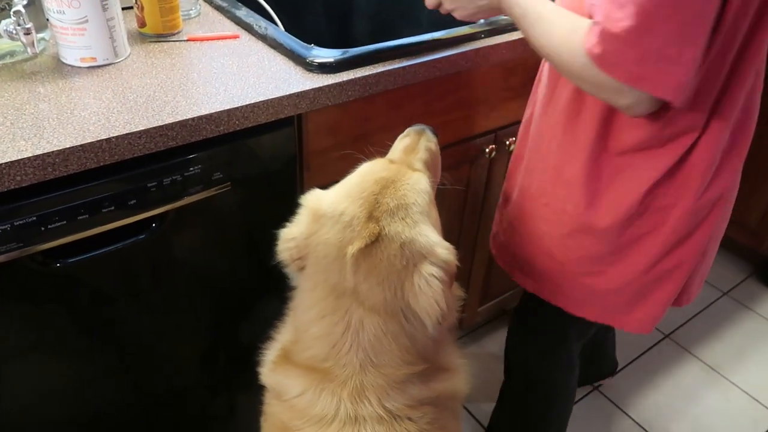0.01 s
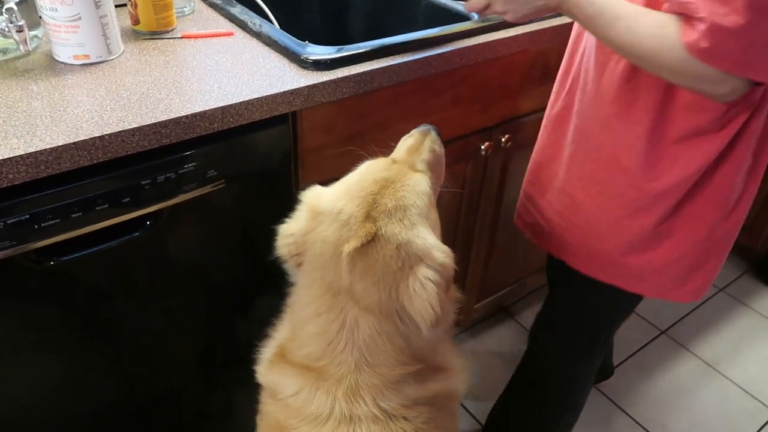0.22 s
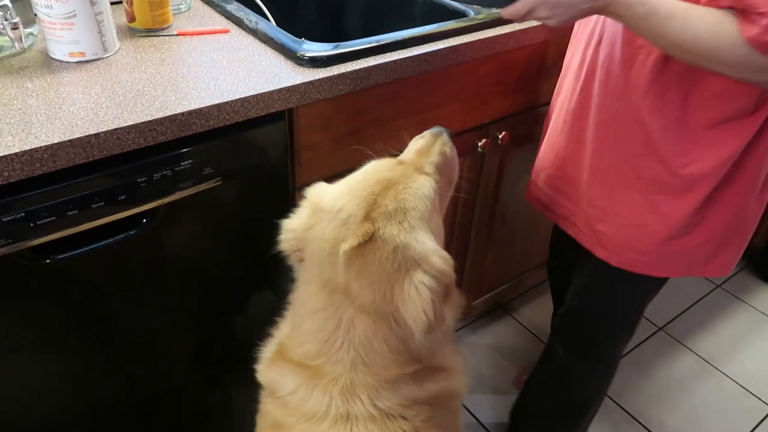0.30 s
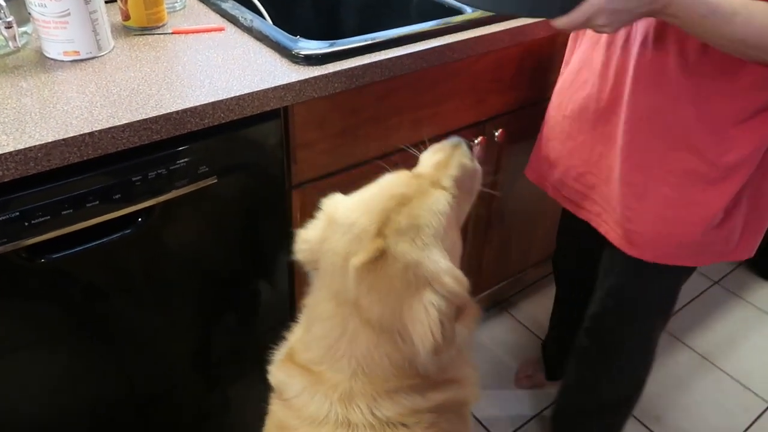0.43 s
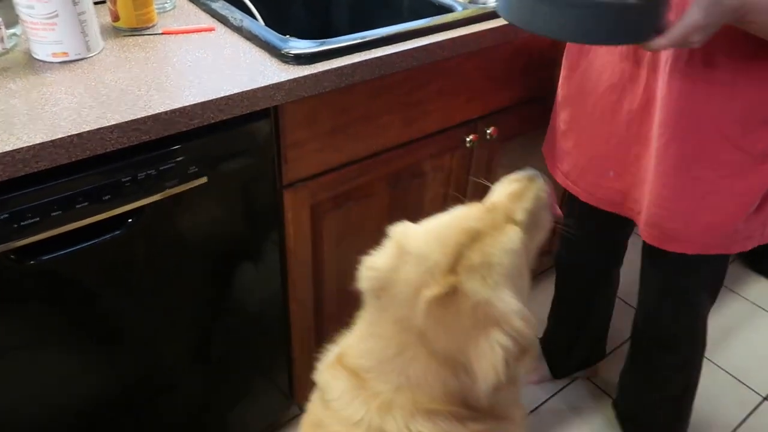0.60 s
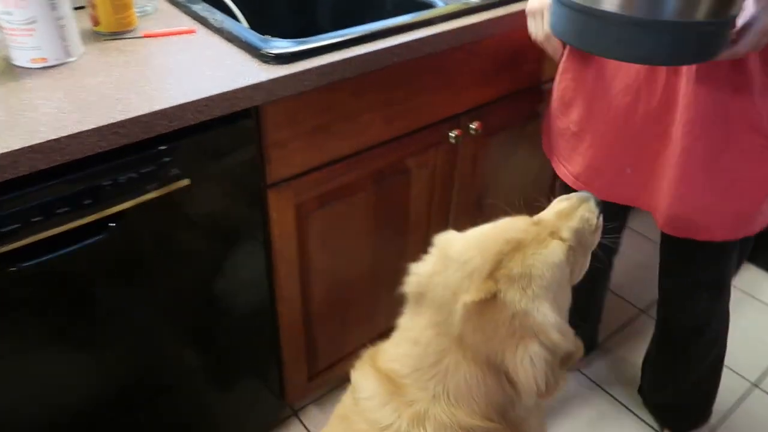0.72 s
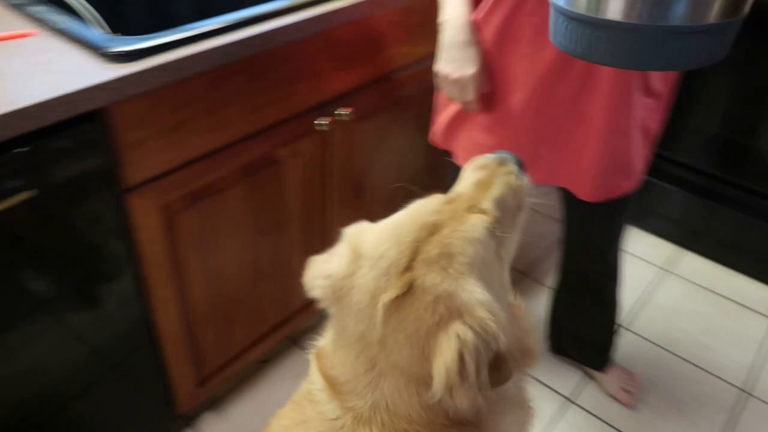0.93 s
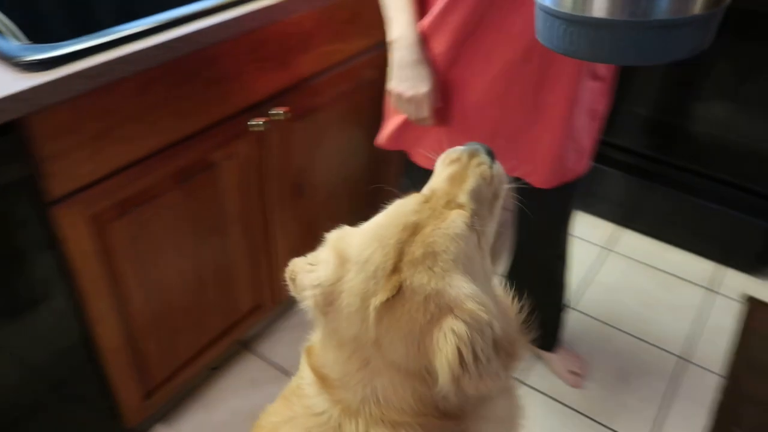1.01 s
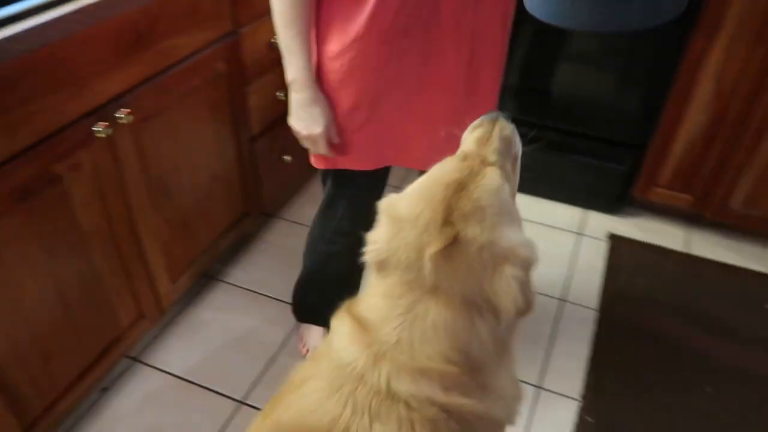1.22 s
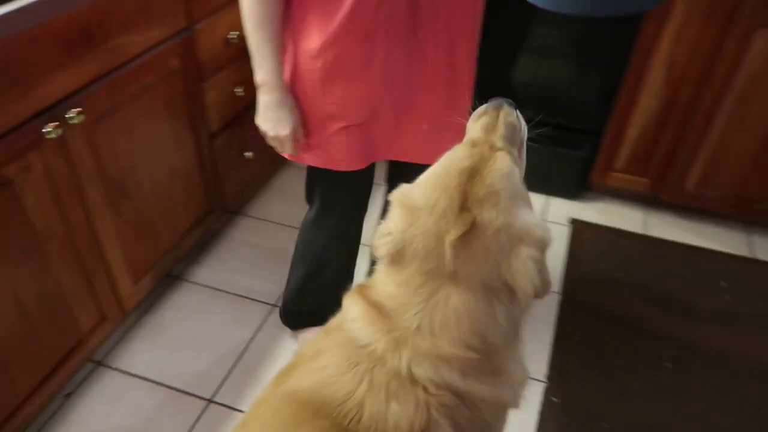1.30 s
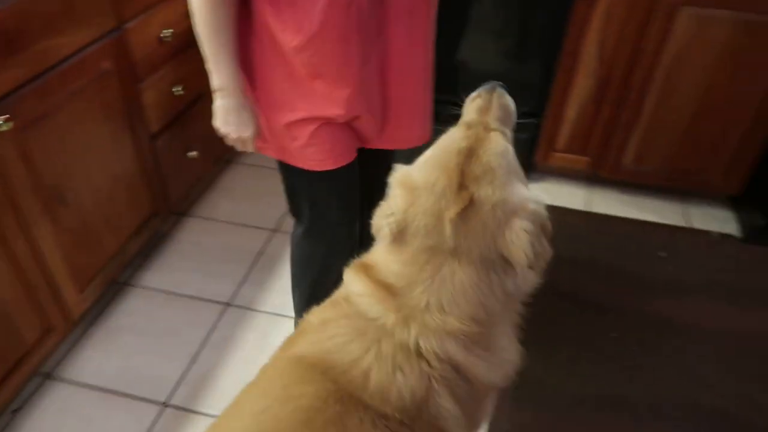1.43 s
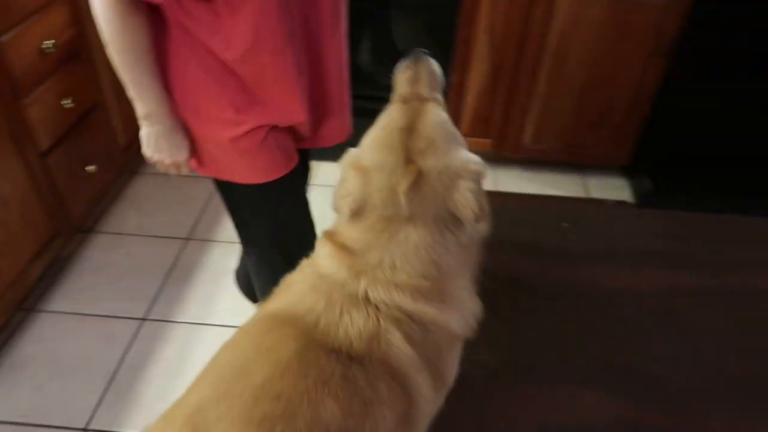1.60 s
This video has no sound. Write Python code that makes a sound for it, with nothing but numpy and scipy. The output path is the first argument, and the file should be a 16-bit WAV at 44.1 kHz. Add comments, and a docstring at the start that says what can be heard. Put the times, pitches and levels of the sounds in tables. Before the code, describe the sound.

A metal bowl knocks twice on a kitchen sink and rattles, then feet and paws scuff tiles

```python
"""A fridge hums under the room noise; a steel bowl then knocks twice against a kitchen sink and rattles
to rest, and feet and paws scuff the tiles. Hum is a sum of wavering sines and room noise is shaped noise;
knocks are damped modes with noise bursts, scuffs are band noise, and claws are damped sines.
A diffuse kitchen tail follows them. A small camera hears it all through two close ports."""
import sys
import numpy as np
from scipy import signal
from scipy.fft import rfft, irfft, next_fast_len
from scipy.io import wavfile
from scipy.ndimage import map_coordinates

SR = 44100
rng = np.random.default_rng(int(sys.argv[2]) if len(sys.argv) > 2 else 0)


def wrap_up_sound(samples):
    """Save the sound to the file named by the first command line argument, as 16-bit audio."""
    columns = np.atleast_2d(samples).T
    # keep every value between -1 and 1, then stretch to whole-number steps
    tamed = np.clip(columns, -1, 1)
    steps = np.round(tamed * 32767).astype(np.int16)
    wavfile.write(sys.argv[1], SR, steps)


def gain_from_decibels(decibels):
    """Convert decibel values to linear amplitude factors."""
    exponent = np.asarray(decibels, float) / 20
    return 10 ** exponent


N = 74970


def unit(x):
    """Normalisation: scales a signal to rms 1."""
    return x / np.sqrt(np.mean(x ** 2) + 1e-20)


def along(points, hz):
    """Logarithmic frequency scale: interpolates (f/Hz, value) points along it."""
    f, value = np.transpose(points)
    return np.interp(np.log(hz + 1), np.log(f + 1), value)


def wobble(rate):
    """Slow random modulation: a smooth curve through rate normal draws a second."""
    knots = rng.standard_normal(int(N * rate / SR) + 4)
    return map_coordinates(knots, [np.arange(N) * rate / SR])


def filtered(x, response):
    """Linear filtering: multiplies the spectrum by a response of frequency."""
    m = next_fast_len(x.shape[-1] + 8192)
    spectrum = rfft(x, m) * response(np.fft.rfftfreq(m, 1 / SR))
    return irfft(spectrum, m)[..., :x.shape[-1]]


def add(out, s, x):
    """Superposition: sums x into out from time s."""
    part = out[round(s * SR):][:len(x)]
    part += x[:len(part)]


# partials of the fridge hum: f/Hz, level/dB (rms, before waver and port response)
HUM = [(50, -58), (119.5, -52), (193, -54.5)]
HUM_WAVER_DB, HUM_WAVER_RAD = 2.2, .8


def fridge_hum():
    """Additive synthesis: each low partial wavers at random in level and phase."""
    t = np.arange(N) / SR
    hum = np.zeros(N)
    for hz, db in HUM:
        level = np.sqrt(2) * gain_from_decibels(db + HUM_WAVER_DB * wobble(7.77))
        hum += level * np.sin(2 * np.pi * hz * t + HUM_WAVER_RAD * wobble(11.86))
    return hum


# spectral shape of the room noise: f/Hz, level/dB (relative, per Hz)
ROOM_NOISE = [(12, -41), (20, -7), (285, -4.5), (721, -12), (859, -9.5), (1050, -16), (1190, -16.5),
              (1530, -18), (1920, -19), (8000, -34.5), (10400, -34), (17600, -120)]
# bustle added to the room noise level: t/s, level/dB
BUSTLE = [(0, 2.5), (.6, 7), (1.7, 4)]
ROOM_NOISE_DB, HISS_DB = -49, -65.5  # rms before bustle, waver and port response
FLOOR_WAVER_DB, FLOOR_WAVER_RATE = 1.1, 9  # scale in dB, random knots a second


def room_noise():
    """Incoherent noise fields: two unrelated draws of shaped room noise and white hiss."""
    t = np.arange(N) / SR
    noise = unit(filtered(rng.standard_normal((2, N)), lambda hz: gain_from_decibels(along(ROOM_NOISE, hz))))
    bustle_db = np.interp(t, *np.transpose(BUSTLE))
    level = gain_from_decibels(ROOM_NOISE_DB + bustle_db + FLOOR_WAVER_DB * wobble(FLOOR_WAVER_RATE))
    return level * noise + gain_from_decibels(HISS_DB) * rng.standard_normal((2, N))


# scuffs of the bowl in the sink (before .6 s) and of feet on tiles:
# start t/s, rise t/s, hold t/s, level/dB, centre f/Hz
SCUFFS = [(.181, 0.0043, 0.059, -51, 750), (.387, 0.0086, 0.00098, -20, 1450),
          (0.692, 0.00066, 0.02, -30.5, 2340), (1.006, 0.0041, 0.071, -44.5, 3000),
          (1.094, 0.00035, 0.0086, -31.5, 3000), (1.115, 0.01, 0.047, -42.5, 1730),
          (1.186, 0.008, 0.081, -50.5, 6300), (1.295, 0.033, 0.026, -40, 715),
          (1.36, 0.04, 0.04, -48, 1600), (1.449, 0.0068, 0.016, -40.5, 2570),
          (1.545, 0.0023, 0.027, -38, 370), (1.598, 0.0084, 0.093, -47.5, 4940)]
# narrower, slightly squeaky rubs: start t/s, rise t/s, hold t/s, level/dB, centre f/Hz
RUBS = [(.94, 0.0056, 0.1, -54, 1500), (1.07, 0.0012, 0.035, -37, 1340),
        (1.45, 0.0038, 0.0081, -45.5, 1280), (1.546, 0.0087, 0.018, -46, 745),
        (1.645, 0.0027, 0.028, -50.5, 2140)]
SCUFF_OCTAVES, RUB_OCTAVES = 1.51, 0.36  # distance above the centre at which the bell is 6 dB down
SCUFF_T60_S, SCUFF_GRIT_DB = 0.16, 1.5
SCUFF_UNEVEN_DB, SCUFF_LOW_STRETCH = 2.5, 1.45  # random unevenness of each spectrum; wider low skirt
SCUFF_TOP_HZ = 12200  # upper limit of the scuff noise, above which it falls steeply


def scuffs(rows, octaves):
    """Friction noise: gritty band noise with a randomly uneven spectrum rises, holds and decays."""
    out, t = np.zeros(N), np.arange(SR // 3) / SR
    for s, rise, hold, db, centre_hz in rows:
        uneven = rng.standard_normal(80)

        def colour(hz):
            """Band-pass filtering: a bell on the octave scale, made uneven at random."""
            stretch = np.where(hz < centre_hz, SCUFF_LOW_STRETCH, 1)
            away = np.log2((hz + 1) / centre_hz) / octaves / stretch
            uneven_db = SCUFF_UNEVEN_DB * np.interp(hz ** .5 / 2, np.arange(80), uneven)
            return gain_from_decibels(-6 * away ** 2 + uneven_db) / (1 + (hz / SCUFF_TOP_HZ) ** 6)

        rub = unit(filtered(rng.standard_normal(len(t)), colour))
        attack = np.minimum(t / rise, 1) ** 2
        release = gain_from_decibels(-60 * np.maximum(t - rise - hold, 0) / SCUFF_T60_S)
        grit_db = SCUFF_GRIT_DB * wobble(296)[:len(t)]
        add(out, s, gain_from_decibels(db + grit_db) * attack * release * rub)
    return out


# reverberation time of the kitchen: f/Hz, t60 t/s
KITCHEN = [(200, 0.31), (1500, 0.44), (6000, 0.35), (14000, 0.39)]


def kitchen(x):
    """Diffuse reverberation: two unrelated noise tails, each frequency dying at its own speed."""
    hz, t, z = signal.stft(rng.standard_normal((2, SR // 2)), SR, nperseg=256)
    decay = gain_from_decibels(-60 * t / along(KITCHEN, hz)[:, None])
    tail = signal.istft(z * decay, SR, nperseg=256)[1]
    delayed = np.pad(x, (200, 0))[None]  # 200 samples before the tail starts
    return signal.fftconvolve(delayed, tail / np.linalg.norm(tail[0]), axes=1)[:, :N]


MODE_SCATTER_DB, RISE_S = 2.1, .001
LONGEST_T60_S = .3  # longest ring time allowed to any mode
RATTLE_S = .008  # time between the random shakes of loose contact


def ring(modes, t, rough):
    """Modal decay: damped sines at new levels, shaken in level and phase by the rattle."""
    hz, db, t60 = np.transpose(modes)[..., None]
    db = db + MODE_SCATTER_DB * rng.standard_normal(hz.shape)
    knots = rng.standard_normal((2, len(hz), 400))
    at = np.clip(t / RATTLE_S, 0, 398)
    k = at.astype(int)
    swell, turn = rough * (knots[..., k] * (1 - at + k) + knots[..., k + 1] * (at - k))
    decay = gain_from_decibels(db - 60 * t / np.clip(t60, .02, LONGEST_T60_S))
    waves = (1 + 0.96 * np.tanh(swell)) * decay * np.sin(2 * np.pi * hz * t + turn)
    return waves.sum(axis=0) * (1 - np.exp(-t / RISE_S))


# spectral shape of the clatter: f/Hz, level/dB (relative, per Hz)
CLATTER = [(100, -24), (300, 0), (800, 6.5), (2000, -1), (4000, -6.5), (8000, -23.5), (15000, -46)]
CLATTER_T60_S = 0.076


def clatter_burst(t):
    """Impact noise: shaped noise that decays exponentially."""
    noise = unit(filtered(rng.standard_normal(len(t)), lambda hz: gain_from_decibels(along(CLATTER, hz))))
    return gain_from_decibels(-60 * t / CLATTER_T60_S) * noise


FIZZ_DB, FIZZ_HZ, FIZZ_T60_S = 10.5, 9100, 0.048  # level relative to the rim ring


def fizz_burst(t):
    """High-passed impact noise: a bright, decaying burst that goes with the rim ring."""
    high_pass = lambda hz: (hz / FIZZ_HZ) ** 2 / (1 + (hz / FIZZ_HZ) ** 2)
    noise = unit(filtered(rng.standard_normal(len(t)), high_pass))
    return gain_from_decibels(FIZZ_DB - 60 * t / FIZZ_T60_S) * noise


# contacts of bowl and sink: t/s, sink boom level/dB, bowl body level/dB, rim ring level/dB,
# clatter level/dB
CONTACTS = [(.242, -26, -18, -38.5, -20), (.247, -17.5, -18, -36.5, -20), (.257, -23, -67, -43, -17.5),
            (0.267, -31, -66, -42.5, -49), (.284, -22, -28, -41.5, -22.5), (.304, -64, -33, -66, -29.5),
            (.402, -32, -21, -44.5, -9), (.409, -19.5, -15.5, -65, -10.5), (.425, -23.5, -19, -45.5, -26),
            (.465, -40.5, -30.5, -48.5, -24.5), (.484, -60, -55, -75, -31),
            (.509, -31.5, -33.5, -40.5, -28), (.534, -32.5, -35.5, -46, -33.5)]
# modes of sink, bowl body and rim: f/Hz, level/dB (relative), t60 t/s (before the cap)
SINK = [(166.6, -10.5, 0.14), (206.6, -10, 0.17), (282.2, 2, 0.16), (357.2, 2, .2), (451, -11, 0.39),
        (534, -6.5, 0.2)]
BOWL = [(376.7, -4, 0.16), (486.7, -7.5, 0.3), (600, -7, 0.17), (718.6, 4.5, 0.18), (822.5, -5.5, 0.22),
        (866, -6.5, 0.21), (927, -3, 0.16), (1300, -15.5, .14), (1894, -12, 0.2), (2220, -14, 0.21)]
RIM = [(4470, 1, .12), (5100, 1, .11), (6088, -7, .28), (6815, -1, .08), (7560, -5, .16), (9630, -7, .13),
       (10200, -9, .16), (11750, -4, .12), (13600, 3, .25)]
BODY_ROUGH, RIM_ROUGH = .45, 1.1  # how far loose contact shakes level and phase
GRIP_S, GRIP_DB_PER_S = 0.546, 235  # a hand closes on the bowl
KNOCK_LOW_HZ = 117


def bowl():
    """Impact excitation: each contact rings sink, bowl and rim and clatters, until the grip damps it."""
    out, t = np.zeros(N), np.arange(SR * 2 // 5) / SR
    for s, sink_db, bowl_db, rim_db, clatter_db in CONTACTS:
        boom = gain_from_decibels(sink_db) * ring(SINK, t, BODY_ROUGH)
        body = gain_from_decibels(bowl_db) * ring(BOWL, t, BODY_ROUGH)
        rim = gain_from_decibels(rim_db) * (ring(RIM, t, RIM_ROUGH) + fizz_burst(t))
        add(out, s, boom + body + rim + gain_from_decibels(clatter_db) * clatter_burst(t))
    grip = gain_from_decibels(-GRIP_DB_PER_S * np.maximum(np.arange(N) / SR - GRIP_S, 0))
    return filtered(out * grip, lambda hz: 1 / (1 + (KNOCK_LOW_HZ / (hz + 1)) ** 6))


# claw ticks on the tiles: t/s, level/dB (start of the decay), f/Hz
CLAWS = [(.716, -35.5, 300), (.694, -29, 4380), (.911, -32.5, 3400), (1.097, -38, 4000),
         (1.399, -28.5, 600), (1.557, -31, 750)]
CLAW_CYCLES = 2.1  # cycles in which a tick falls by a factor e


def claws():
    """Damped oscillation: each tick on the tiles is a sine that dies within a few cycles."""
    out, t = np.zeros(N), np.arange(SR // 20) / SR
    for s, db, hz in CLAWS:
        add(out, s, gain_from_decibels(db) * np.exp(-t * hz / CLAW_CYCLES) * np.sin(2 * np.pi * hz * t))
    return out


# response the two ports have in common: f/Hz, level/dB
COMMON = [(30, 1.5), (6000, -4), (7600, -2.5), (8600, -12), (10000, -5.5), (12000, -9.5), (16000, -25)]
# response of the difference between the ports: f/Hz, level/dB
DIFFERENT = [(30, -59), (125, -16), (700, -13), (1500, -11.5), (3000, -8), (6000, -4.5), (9000, 0),
             (13800, 5), (15500, -9)]
WET_DB, SIDE_DIRECT = -9, 0.58  # tail level; share of direct sound in the difference
LEFT_LEAN, LEAN_HZ = 0.054, 600  # extra share on the left; corner above which sound is directional


def scene():
    """Sum and difference: pressure at the camera, plus and minus what differs across its ports."""
    near = bowl() + scuffs(SCUFFS, SCUFF_OCTAVES) + scuffs(RUBS, RUB_OCTAVES) + claws()
    centre, across = gain_from_decibels(WET_DB) * kitchen(near) + near * [[1], [SIDE_DIRECT]]
    noise = room_noise()
    aimed = lambda hz: 1 / (1 + (LEAN_HZ / (hz + 1)) ** 2)
    common = lambda x: filtered(x, lambda hz: gain_from_decibels(along(COMMON, hz)))
    # 1j turns the difference by a quarter period
    across = filtered(filtered(across, aimed) + noise[1], lambda hz: 1j * gain_from_decibels(along(DIFFERENT, hz)))
    across = across + LEFT_LEAN * common(filtered(centre, aimed))
    centre = common(centre + noise[0] + fridge_hum())
    return np.array([centre + across, centre - across])


def top_cut(x):
    """Nothing passes above the cut-off."""
    return signal.sosfilt(signal.butter(12, 15760, fs=SR, output="sos"), x)


LOW_CUT_HZ, TOP_HZ = 28, 15780


def record(dry):
    """Band limitation: a low cut and a sharp upper limit bound the finished mix."""
    mix = filtered(dry, lambda hz: (hz < TOP_HZ) / (1 + (LOW_CUT_HZ / (hz + 1)) ** 4))
    return top_cut(mix)


dry = scene()
out = record(dry)
wrap_up_sound(out)
```